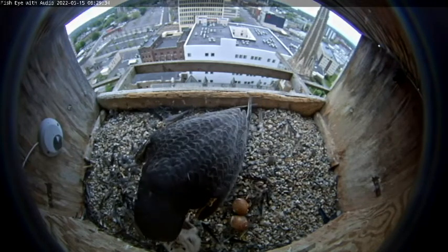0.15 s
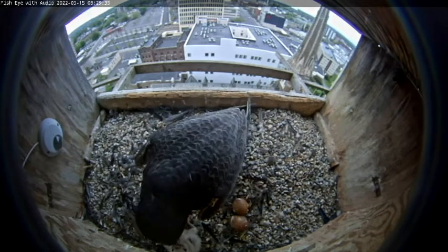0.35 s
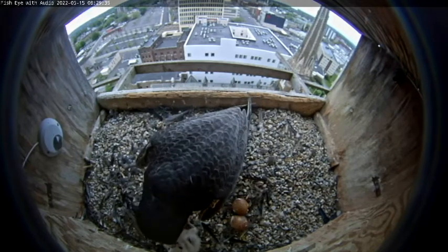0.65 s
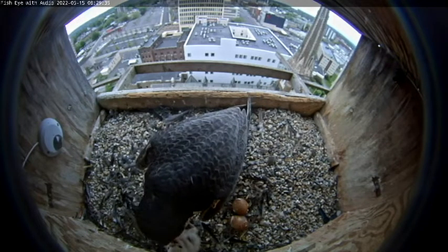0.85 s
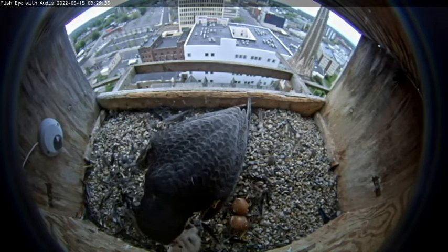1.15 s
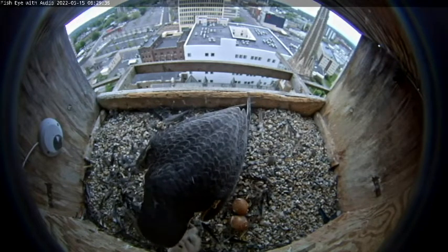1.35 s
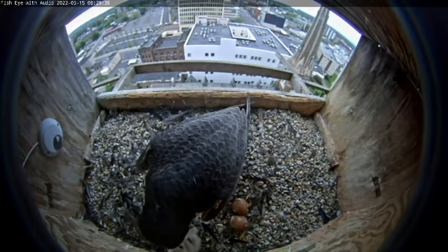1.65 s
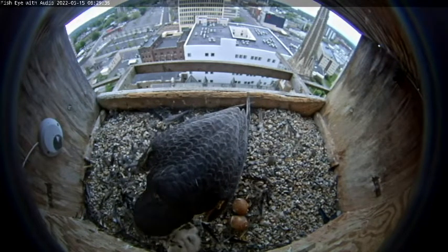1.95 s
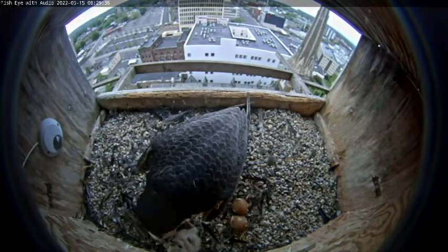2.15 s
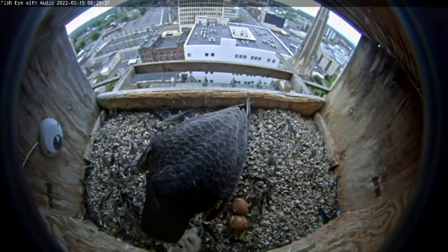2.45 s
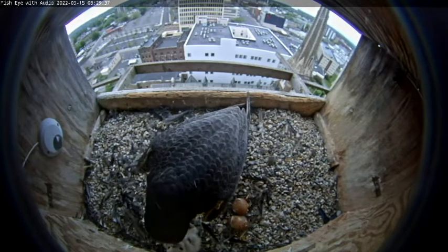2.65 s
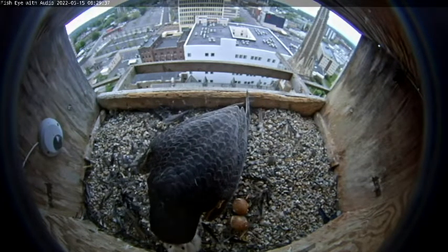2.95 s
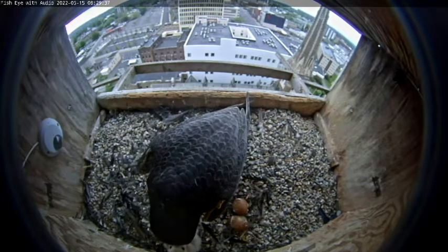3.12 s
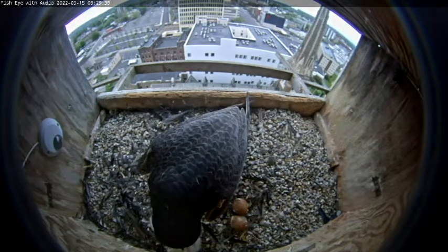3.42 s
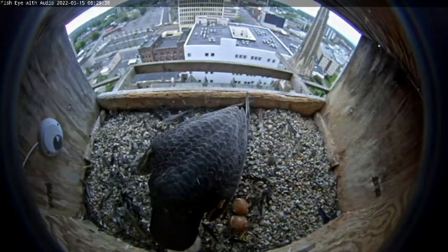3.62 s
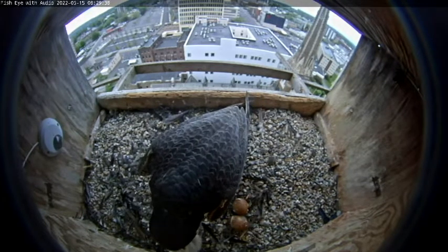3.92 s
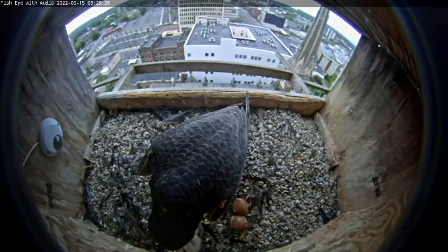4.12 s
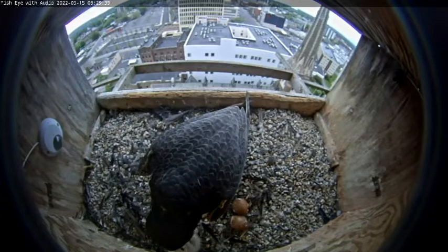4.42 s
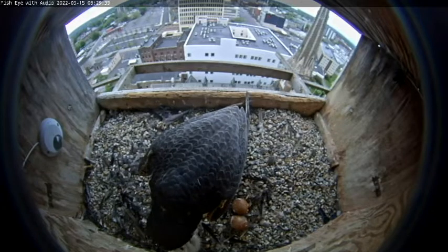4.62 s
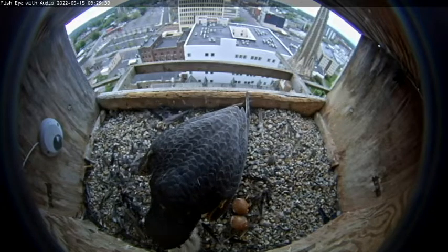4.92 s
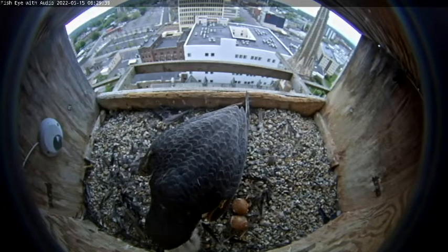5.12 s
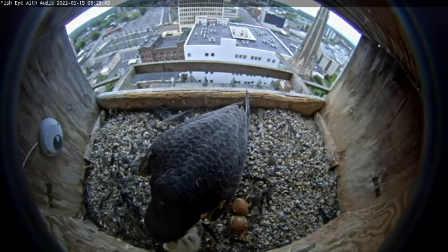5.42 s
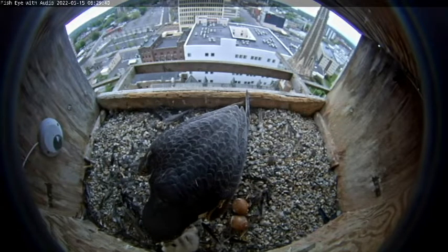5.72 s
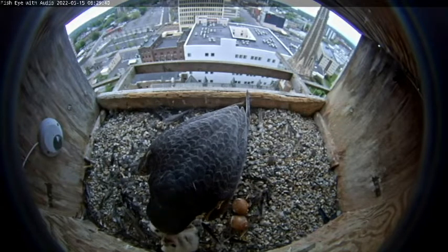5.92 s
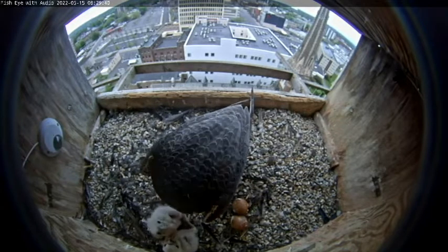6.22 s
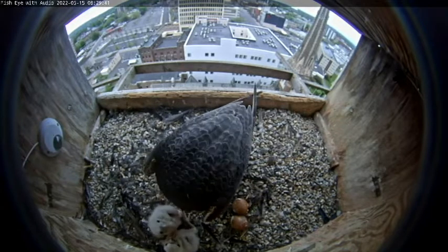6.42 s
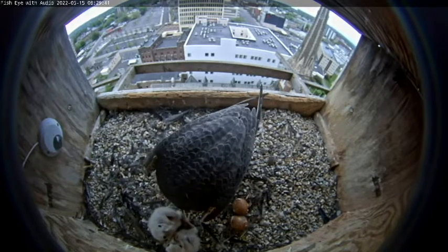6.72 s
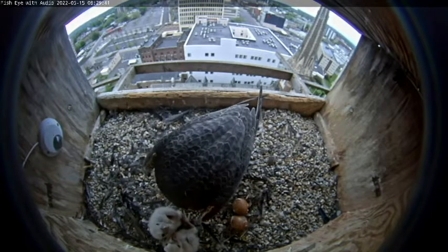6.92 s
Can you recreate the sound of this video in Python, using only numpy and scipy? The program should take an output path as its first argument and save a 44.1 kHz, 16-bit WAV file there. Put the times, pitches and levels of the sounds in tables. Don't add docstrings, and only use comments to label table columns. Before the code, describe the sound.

A low, soft traffic rumble with broad hiss, a faint wavering engine drone and a weak fan hum runs throughout, heard inside a small wooden box. Dull knocks and pebble ticks come at 0.25, 0.43 and 0.7 seconds, then a hard, bright stone strike at 0.8, the loudest knock. Sparse gravel ticks follow. From 1.3 to 2.4 a chick gives a faint peep and a thin rising whistle, held and then falling. A short chirp comes at 2.8, a steady piercing wail from 3.05 to 3.8, then a fluttering bleat and quaver until 4.7, with a second chick briefly overlapping. More clicks at 4.9 and 5.4 accompany a rising, pleading whistle from 5.1 to 5.8. At 6.0 both shriek higher; a broken, rapidly sliding warble runs to 6.9, ending in a croaky blip around 7.0. The treble is dull and slightly gritty.

```python
import sys
import numpy as np
from scipy import signal
from scipy.fft import rfft, irfft, next_fast_len
from scipy.io import wavfile
from scipy.ndimage import uniform_filter1d, minimum_filter1d, map_coordinates

SR = 44100
rng = np.random.default_rng(int(sys.argv[2]) if len(sys.argv) > 2 else 0)


def store_pcm(level_fs):
    pcm = np.round(np.clip(level_fs, -1, 1) * 32767).astype(np.int16)
    wavfile.write(sys.argv[1], SR, np.atleast_2d(pcm).T)


def gain_from_decibels(decibels):
    exponent = np.asarray(decibels, float) / 20
    return 10 ** exponent


N = 311346

# (time [s], pitch [Hz], effort [dB], beak opening [dB])
PEEP_CALL = [((0, -2, 0), [(1.31, 1420, -78, -15), (1.342, 1479, -55.5, -27), (1.382, 1510, -63, -27),
             (1.438, 1550, -61, -22), (1.47, 1520, -62, -20), (1.498, 1400, -70, -14)])]
CLIMB_CALL = [
    ((0, 0, -6), [(1.5, 1480, -64, -12), (1.56, 1570, -57, -8), (1.585, 1590, -60, -9), (1.6, 1670, -58, -19), (1.7, 1805, -55.5, -21), (1.78, 1817, -53.5, -15), (1.83, 1907, -67, -9)]),
    ((6.2, -14, -12), [(1.86, 1890, -66, -8), (1.95, 1910, -60, -13)]),
    ((5.6, -3, -1), [(1.99, 1996, -61.5, -7), (2.04, 2040, -61.5, -9.5), (2.11, 2003, -60, -7.5), (2.28, 1966, -57, -12.5), (2.375, 2025, -60, -6.5), (2.4, 1954, -58, -16), (2.44, 1600, -63.5, -34)]),
]
CHIRP_CALL = [((0, -29, -12), [(2.785, 1747, -61, -24), (2.801, 1814, -56, -27), (2.841, 1930, -60, 5),
              (2.873, 1966, -58, -1)])]
WAIL_CALL = [((6, 1, 1), [(3.045, 1553, -56, -13), (3.061, 1806, -62.5, -11), (3.109, 1978, -51, -18),
             (3.169, 1940, -57.5, -14.5), (3.325, 1975, -52, -15), (3.557, 2008, -57, -12),
             (3.701, 1988, -52, -15.5), (3.781, 1950, -58, -13.5), (3.795, 1760, -62, -12),
             (3.809, 1493, -57, -29)])]
BLEAT_CALL = [((-18, 0, -5.5), [(3.888, 1735, -54, -8), (3.92, 1710, -48, -7), (3.972, 1740, -48.5, -8),
              (4.0, 1790, -51.5, -2.5), (4.036, 1746, -51, -2), (4.08, 1662, -46.5, -6),
              (4.096, 1590, -58, -4)])]
QUAVER_CALL = [
    ((-1.8, -0.5, -5.5), [(4.12, 1522, -55, -6.5), (4.152, 1727, -56, 0), (4.18, 1880, -55.5, -10), (4.205, 1720, -53.5, -3), (4.226, 1733, -54, -2.5), (4.245, 1795, -53, -14.5)]),
    ((-1.3, -6, -7.5), [(4.36, 1820, -52.5, -14.5), (4.45, 1830, -51.5, -15), (4.467, 1914, -61.5, -0.5), (4.484, 1842, -51.5, -7), (4.57, 1800, -50.5, -11.5), (4.63, 1790, -51.5, -11), (4.68, 1766, -52.5, -9), (4.731, 1672, -49.5, -12)]),
]
PLEA_CALL = [
    ((1, -1.5, -9), [(5.066, 1104, -63, 2), (5.085, 1330, -59, 6.5), (5.1, 1402, -58, 1.5), (5.113, 1690, -57, 2), (5.145, 1684, -53.5, 0), (5.172, 1780, -52, 0), (5.195, 1680, -53.5, -1)]),
    ((0, -6.5, -7), [(5.215, 1730, -52, -13), (5.25, 1751, -51, -11), (5.31, 1750, -52, -13), (5.395, 1790, -51.5, -10)]),
    ((0, -0.83, -14), [(5.425, 1863, -55, -7), (5.47, 1884, -58, -10), (5.53, 1870, -54.5, -14), (5.585, 1904, -57.5, -7), (5.645, 1824, -52.5, -13)]),
    ((0, -6.5, -7.5), [(5.67, 1793, -48.5, -11), (5.695, 1852, -52, -9), (5.72, 1827, -52.5, -7.5), (5.76, 1812, -48.5, -6), (5.818, 1800, -50, -5.5)]),
]
LONG_WARBLE_CALL = [
    ((0, -3.5, -25), [(5.96, 1620, -67, 6), (5.988, 2010, -54, 5.4), (6.024, 2220, -56, 13), (6.084, 2229, -56, 11.5)]),
    ((0, -5.5, -29), [(6.12, 1970, -56.5, 7.5), (6.14, 1956, -61, 9), (6.176, 1985, -56.5, 6.5), (6.2, 1990, -55.5, -4), (6.22, 1982, -58, 2)]),
    ((-2.5, -5, -31), [(6.244, 1905, -57.5, -3.5), (6.284, 2073, -57, 3), (6.32, 1975, -55.5, -4.5), (6.345, 1886, -49, -19), (6.365, 1666, -58, -27), (6.388, 1520, -56, -14)]),
                    ((-4.5, 0, -22), [(6.415, 1730, -53, 1.5), (6.43, 1685, -51.5, -2), (6.448, 1727, -50, -1)]),
    ((0, -15, -31), [(6.465, 1863, -53, 6), (6.495, 2040, -52.5, 2.5), (6.528, 2037, -54, 3), (6.565, 1860, -54, -8), (6.6, 1730, -49.5, 0)]),
    ((-5, 0, -24), [(6.622, 1677, -50.5, -8), (6.65, 1720, -52, 1)]),
    ((0, 0, -15.5), [(6.672, 1408, -54, 5), (6.684, 1375, -53, 13)]),
    ((0, -14.5, -50), [(6.712, 1765, -51, 8.9), (6.74, 1925, -54.5, 2)]),
    ((0, -25, -52), [(6.776, 1734, -49.5, 2.3), (6.8, 1544, -52.5, 2.96), (6.83, 1519, -52, 2)]),
    ((-18, 0, -27), [(6.85, 1480, -61, 13), (6.875, 1440, -55, 9), (6.897, 1425, -52, 2)]),
]
CROAK_CALL = [((0, -9.5, -14.5), [(6.897, 1263, -44.5, 3), (6.92, 1280, -63, 15), (6.942, 1245, -60, 15),
              (6.955, 1215, -60, -2), (6.976, 1320, -50, 7.5), (7.008, 1870, -50, -13),
              (7.058, 1700, -53.5, -17)])]
SIBLING_CALLS = [
    ((0, -22, -20), [(4.125, 1540, -73, -8.5), (4.165, 1485, -72, -7), (4.195, 1590, -53, -3), (4.21, 1710, -55, -13)]),
    ((-1.3, -3, -4), [(4.408, 1227, -53, -3), (4.428, 1158, -50, -12), (4.448, 1249, -51, -2), (4.468, 1130, -49.5, -1), (4.496, 1190, -52, 1), (4.514, 1395, -52.5, 10), (4.53, 1315, -53, 1)]),
    ((0, 2.7, -14), [(4.548, 1380, -62, 5), (4.56, 1457, -63, 14), (4.584, 1476, -60, -5.5), (4.6, 1340, -55, -29)]),
    ((0, -11.5, -40), [(6.0, 2274, -65, 16), (6.024, 2430, -58, 13), (6.064, 2453, -49.5, 8), (6.096, 2300, -62, 15)]),
    ((0, -5, -8), [(7.012, 1190, -58, -21), (7.02, 1110, -52, -27), (7.032, 1130, -62, -24)]),
]
# (first dip [s], last dip [s], depth [Hz])
THROAT_FLUTTERS = [
    (3.902, 4.07, 70),
    (4.232, 4.72, 89.7),
]
DIP_SPACING_S, DIP_WIDTH_S = 0.052, 0.012
PITCH_WANDER, FADING_DB, SLIDE_LOSS_DB = 0.004, 1.7, 4.5
# (frequency [Hz], level [dB])
BOX_COLOUR = [(1100, 5.5), (1300, 7), (1570, 1), (1690, 8.5), (1810, 4), (1850, 0), (1885, -7), (1950, 0.5),
              (2000, 2.5), (2500, -11), (3500, -4.5), (4400, -1), (5150, 2.5), (5450, 0.5), (5750, 5),
              (6100, 4.5), (7000, -1.5), (7500, -6), (8200, -13)]

# (time [s], peak [dB], length [ms])
PEBBLE_TICKS = [(0.283, -48, 16), (0.7164, -49, 15), (0.7344, -43.5, 5.2), (0.7543, -48, 10),
                (0.786, -48, 9.5), (0.8433, -47, 5.7), (1.0311, -65, 9.7), (1.173, -58, 9.8),
                (1.2425, -46.5, 5), (1.4911, -52, 4.4), (2.464, -60, 6.4), (2.7485, -60, 7.1),
                (2.8724, -63, 7.5), (3.033, -58, 13), (4.9097, -54, 16), (4.9314, -45, 9.9),
                (5.3883, -45, 5.9), (5.4236, -48.5, 6.4), (5.4278, -42, 7.7), (5.4354, -42, 9.8),
                (5.853, -57.5, 8.6), (6.9041, -62, 10), (6.9393, -64, 8)]
# (time [s], peak [dB], length [ms])
FOOT_SCUFFS = [(.74, -52, 26), (0.792, -24, 11), (0.809, -41, 14), (1.355, -45, 19), (1.378, -49, 19),
               (1.41, -55, 40), (2.803, -61, 39), (2.835, -54, 47), (4.152, -46, 76), (4.745, -53, 25),
               (5.402, -44, 10), (5.415, -53, 15), (6.28, -51, 43), (7.045, -50, 34)]
# (time [s], peak [dB], length [ms], deep knock [dB], bright knock [dB])
BOARD_KNOCKS = [
    (.2548, -44, 13, -33, -36),
    (.4274, -35, 9.2, -24, -50),
    (.4312, -50, 4.3, -59, -58),
    (.6725, -46.5, 8.4, -33, -47),
    (.796, -18, 1.5, -26, -28),
    (.7967, -13, 3, -27, -29),
    (.7992, -20, 5, -32, -21),
]
# (frequency [Hz], width [Hz], level [dB])
STONE_MODES = [(4440, 340, -10), (6340, 900, -5), (7290, 550, 0.5), (7240, 880, -0.5), (3140, 1500, -15.5)]
BOARD_MODES = [(377, 22, 0), (515, 45, -9), (270, 50, -9)]
PANEL_MODES = [(740, 150, -3), (1710, 110, -10.5), (2260, 140, -8.5), (3180, 150, -52)]

# (frequency [Hz], density [dB per Hz])
RUMBLE_COLOUR = [(8.8, -20), (15, -3.5), (19, -4.5), (22, -15), (54, -3.5), (91, -3), (144, -7.5),
                 (177, -12), (257, -13), (306, -30.5), (326, -27.5), (369, -20), (439, -30), (582, -32),
                 (640, -46.5), (830, -58), (1410, -120)]
# (frequency [Hz], density [dB per Hz])
HISS_COLOUR = [(290, -30), (500, -9), (567, -14.5), (788, -1.5), (1230, -0.5), (1540, -11), (1690, -9.5),
               (1750, -12.5), (1870, -10.5), (2200, -10), (2490, -16), (6780, -24), (7250, -28),
               (7600, -35.5), (9880, -64), (16700, -120)]
# (time [s], pitch [Hz], level [dB])
ENGINE_DRONE = [(0, 100.6, -42), (.2, 102.9, -42.5), (.7, 101.3, -40), (1.15, 103.9, -45.5),
                (1.3, 102.6, -58.5), (4.6, 110.6, -65), (4.9, 111.1, -52), (5.25, 110.9, -44),
                (5.6, 112.2, -53), (6.3, 111.8, -55.5), (7.06, 111.5, -49)]
# (multiple of the blade rate, level [dB rms])
FAN_TONES = [(1, -64.5), (2, -73.5), (3, -66.5), (6, -72.5)]
BLADE_HZ = 297.6
RUMBLE_DB, HISS_DB = -42, -53
ROAD_DB = 5


def unit(x):
    return x / np.sqrt(np.mean(x ** 2) + 1e-20)


def along(points, hz):
    f, v = np.transpose(points)
    return np.interp(np.log(hz + 1), np.log(f + 1), v)


def wobble(rate, size=N):
    knots = rng.standard_normal(int(max(size, SR) * rate / SR) + 4)
    return map_coordinates(knots, [np.arange(size) * rate / SR])


def filtered(x, response):
    m = next_fast_len(len(x) + 8192)
    return irfft(rfft(x, m) * response(np.fft.rfftfreq(m, 1 / SR)), m)[:len(x)]


def chick(calls, flutters, fall_db):
    out = np.zeros(N + SR)
    dips = [(at, depth) for first, last, depth in flutters for at in np.arange(first, last, DIP_SPACING_S)]
    for call in calls:
        rows = [(*row, *tone) for tone, syllable in call for row in syllable]
        s, hz, effort, beak, *colour = np.transpose(rows)
        t = np.arange(s[0], s[-1], 1 / SR)
        size = len(t)

        pitch = uniform_filter1d(np.interp(t, s, hz), size=530, mode="nearest")
        pitch -= sum(depth * np.exp(-.5 * ((t - at) / DIP_WIDTH_S) ** 2) for at, depth in dips)
        pitch *= 1 + .003 * wobble(55, size) + PITCH_WANDER * wobble(16, size)
        phase = 2 * np.pi * np.cumsum(pitch) / SR
        glide = np.minimum(abs(np.gradient(pitch)) * SR / 12000, 1)

        colour += [colour[-1] - fall_db, colour[-1] - 2.1 * fall_db]
        levels = [effort] + [effort + beak + db for db in colour]
        edge = np.clip(np.minimum(t - s[0], s[-1] - t) / .002, 0, 1)
        for k, db in enumerate(levels, start=1):
            rasp = (.09 + .6 * glide) * np.sqrt(k) * wobble(350, size)
            fading_db = FADING_DB * wobble(18, size) - SLIDE_LOSS_DB * glide
            unsteady_db = np.sqrt(k) * .8 * wobble(40, size) + np.sqrt(k - 1) * fading_db
            level_db = np.interp(t, s, db) + along(BOX_COLOUR, k * pitch) + unsteady_db
            partial = np.sqrt(2) * edge * gain_from_decibels(level_db) * (1 + rasp) * np.sin(k * phase)
            out[round(s[0] * SR):][:size] += partial
    return out[:N]


def modes(table):
    def response(f):
        total = 0
        for k, (centre, width, db) in enumerate(table):
            damping = 1j * f * width
            total = total + (-1) ** k * gain_from_decibels(db) * damping / (centre ** 2 - f ** 2 + damping)
        return total
    return response


def gravel():
    rattle, deep, bright = np.zeros((3, N + SR))
    t = np.arange(SR // 8) / SR
    contacts = [(*row, .04) for row in PEBBLE_TICKS]
    contacts += [(*row, .3) for row in FOOT_SCUFFS]
    contacts += [(*row[:3], .06) for row in BOARD_KNOCKS]
    for s, db, ms, rise in contacts:
        u = t * 1000 / ms
        envelope = gain_from_decibels(-30 * u) * (1 - np.exp(-u / rise))
        grain = gain_from_decibels(1.9 * wobble(660, size=len(t))) * rng.standard_normal(len(t))
        rattle[round(s * SR):][:len(t)] += gain_from_decibels(db + 16.5) * envelope * grain
    for s, db, _, deep_db, bright_db in BOARD_KNOCKS:
        start = round(s * SR)
        rattle[start + 10] += gain_from_decibels(db + 12)
        deep[start:][:len(t)] += gain_from_decibels(deep_db + 22.5) * t / 0.00061 * np.exp(-t / 0.00048)
        bright[start] += gain_from_decibels(bright_db + 35.5)
    stone = filtered(rattle, modes(STONE_MODES))
    board = filtered(deep, modes(BOARD_MODES))
    panel = filtered(bright, modes(PANEL_MODES))
    return (stone + board + panel)[:N]


def walls(x, t60):
    t = np.arange(SR // 8) / SR
    tail = rng.standard_normal(len(t)) * gain_from_decibels(-60 * t / t60)
    late = np.pad(x, (60, 0))
    return signal.fftconvolve(late, tail / np.linalg.norm(tail))[:N]


def rush(spectrum, patchy_db):
    z = signal.stft(rng.standard_normal(N), nperseg=512)[2]
    field = uniform_filter1d(rng.standard_normal(z.shape), size=5, axis=0)
    field = uniform_filter1d(field, size=12, axis=1)
    x = signal.istft(z * gain_from_decibels(patchy_db * unit(field)), nperseg=512)[1][:N]
    return unit(filtered(x, lambda hz: gain_from_decibels(along(spectrum, hz))))


def city():
    t = np.arange(N) / SR
    when, hz, db = np.transpose(ENGINE_DRONE)
    drone_db = np.interp(t, when, db)
    road = np.hypot(gain_from_decibels(RUMBLE_DB), gain_from_decibels(drone_db - ROAD_DB))
    rumble = road * gain_from_decibels(0.9 * wobble(5.4)) * rush(RUMBLE_COLOUR, patchy_db=1.0)
    hiss = gain_from_decibels(HISS_DB + 0.31 * wobble(9.7)) * rush(HISS_COLOUR, patchy_db=0.64)
    firing = 2 * np.pi * np.cumsum(np.interp(t, when, hz) * (1 + 0.021 * wobble(11))) / SR
    drone = np.sqrt(2) * gain_from_decibels(drone_db + 2.2 * wobble(14)) * np.sin(firing)
    turn = 2 * np.pi * np.cumsum(BLADE_HZ * (1 + 0.0016 * wobble(1.5))) / SR
    fan = sum(np.sqrt(2) * gain_from_decibels(level + 2.0 * wobble(3)) * np.sin(k * turn) for k, level in FAN_TONES)
    return rumble + drone + hiss + fan


def scene():
    first = [PEEP_CALL, CLIMB_CALL, CHIRP_CALL, WAIL_CALL, BLEAT_CALL, QUAVER_CALL, PLEA_CALL,
             LONG_WARBLE_CALL, CROAK_CALL]
    voices = chick(first, THROAT_FLUTTERS, fall_db=10)
    voices += chick([[syllable] for syllable in SIBLING_CALLS], [], fall_db=6.5)
    voices += gain_from_decibels(-15) * walls(voices, t60=.035)
    stones = gravel()
    stones = stones + gain_from_decibels(-8) * walls(stones, t60=0.046)
    return (voices + stones + city())[None]


def treble_dropouts(x):
    hz, _, z = signal.stft(x, SR, nperseg=2816)
    band = np.arange(len(hz)) // 16
    power = np.add.reduceat(abs(z) ** 2, np.arange(0, len(hz), 16))
    loudest = power[band[hz > 2500][0]:].max(axis=0)
    nearby = -minimum_filter1d(-power, size=7, axis=0)
    mood_db = 4 * unit(uniform_filter1d(rng.standard_normal(power.shape), size=3, axis=1))
    need = np.maximum(loudest * gain_from_decibels(2 * -38), nearby * gain_from_decibels(2 * -24)) * gain_from_decibels(2 * mood_db)
    top_db = 3 + 6 * wobble(SR / 6, size=power.shape[1])
    need[band[hz > 7450][0]:] *= gain_from_decibels(2 * top_db)
    keep = (power > need)[band] | (hz < 3400)[:, None]
    return signal.istft(z * np.where(keep, 1, gain_from_decibels(-22.0)), SR, nperseg=2816)[1][:N]


def low_pass(x):
    return signal.sosfilt(signal.butter(12, 9160, fs=SR, output="sos"), x)


def record(dry):
    camera_rate = 16000
    # (frequency [Hz], level [dB])
    top = [(2800, -0.5), (4000, -3.5), (5200, -2.5), (7500, -0.5), (7750, -8), (7880, -9), (7950, -12),
           (8000, -19.5), (8010, -76.0)]
    leak = [(7990, -102), (8000, -9.0), (8400, -9.0), (8700, -22.0), (9000, -30.5), (9200, -48), (9300, -90)]
    x = treble_dropouts(filtered(dry[0], lambda hz: gain_from_decibels(along(top, hz))))
    mirror = 2 * x * np.cos(2 * np.pi * camera_rate * np.arange(N) / SR)
    x += filtered(mirror, lambda hz: gain_from_decibels(along(leak, hz)))
    x += .0088
    return low_pass(x[None])


dry = scene()
out = record(dry)
store_pcm(out)
```